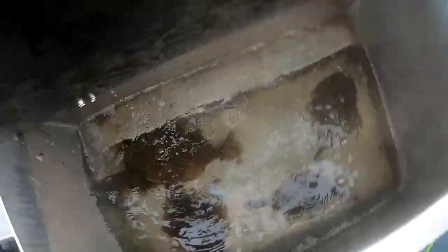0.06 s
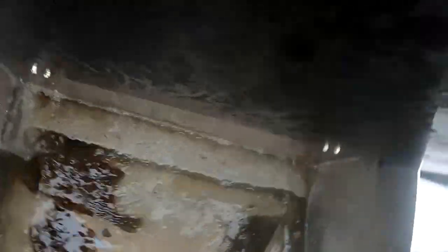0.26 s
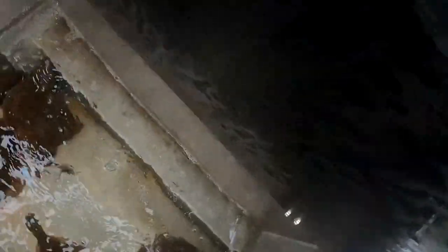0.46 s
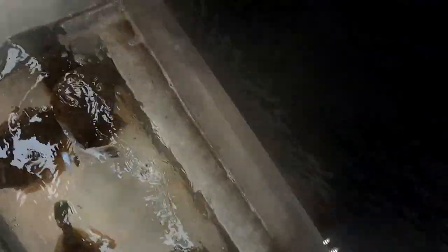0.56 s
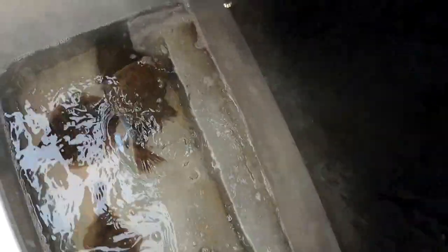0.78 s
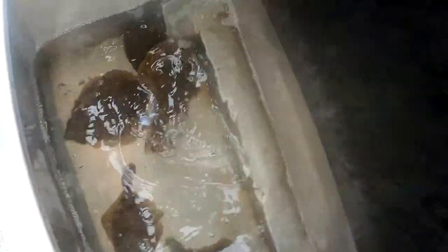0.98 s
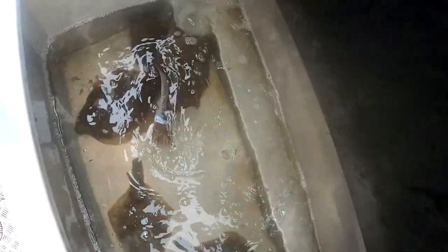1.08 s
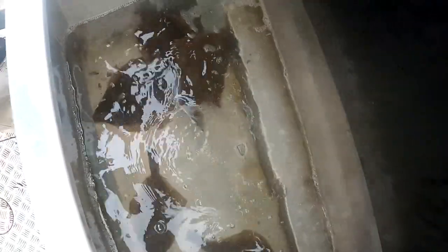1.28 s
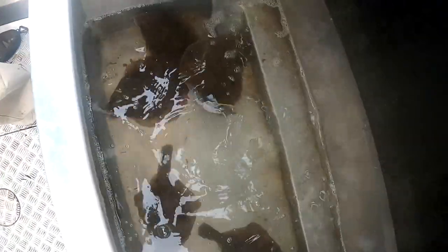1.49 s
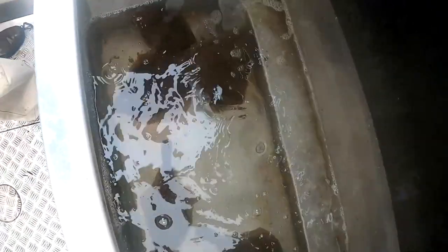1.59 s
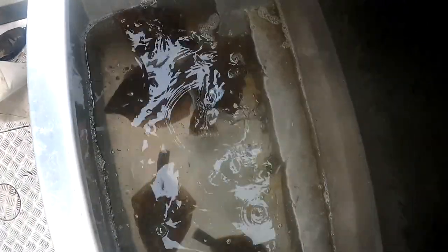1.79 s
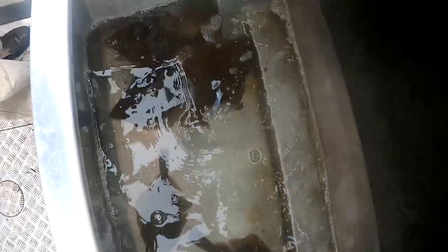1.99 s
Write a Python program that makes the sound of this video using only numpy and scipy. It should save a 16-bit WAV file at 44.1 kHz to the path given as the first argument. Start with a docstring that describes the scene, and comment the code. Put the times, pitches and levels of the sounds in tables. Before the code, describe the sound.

Water splashes close by as a fish thrashes in a boat's shallow tank, at about 0.2, 0.3 and 0.6 seconds, with slaps, spray, deep gulps and a hollow boom. The low churning fades by about 1.3 seconds while water sloshes and single drips and bubbles plink between the walls. From 1.8 seconds a small wave laps with a cluster of bubbles, over a faint outdoor hush.

```python
"""A fish thrashes three times in a boat's shallow water tank, heard from just above it.
Each splash slaps the surface, throws spray, traps big gulping pockets of air and sets the tank booming.
Then the water sloshes: single bubbles and drips plink between the walls, and a wave laps at the end.
Underneath, small bubbles fizz and a deep churn dies away into a faint outdoor hush."""
import sys
import numpy as np
from scipy import signal
from scipy.io import wavfile

SR = 44100
rng = np.random.default_rng(int(sys.argv[2]) if len(sys.argv) > 2 else 0)


def put_to_file(sound):
    """Save the sound as 16-bit audio at rate SR, in the file named by the first command-line argument."""
    columns = np.atleast_2d(sound).T  # one column per channel
    safe = np.clip(columns, -1, 1)
    whole_steps = np.round(safe * 32767)
    wavfile.write(sys.argv[1], SR, whole_steps.astype(np.int16))


N = 90404
T = np.arange(N) / SR

# strokes of the fish: start_s, boom_db, slap_db, spray_db, rise_s, t60_s
STROKES = [(0.205, 3, -19.5, -41, 0.03, 0.27), (0.3094, -1, -13, -43.5, 0.0012, 0.043),
           (0.624, -2, -12.5, -31.5, 0.01, 0.088)]
# tone of the slap and of the spray: freq_hz, density_db
SLAP_EQ = [(30, -13), (100, 4.5), (220, 0.5), (400, 1.5), (520, 2), (720, -0.5), (1150, -17), (1600, -14),
           (3000, -44)]
SPRAY_EQ = [(600, 9), (1500, 5), (2600, 19.5), (4000, -0.5), (6000, 1), (9000, -29), (12000, -40.5),
            (16000, -46)]
def splashes():
    """A dull slap and a bright burst of spray for each stroke of the fish."""
    slap, spray = shaped_noise(SLAP_EQ), shaped_noise(SPRAY_EQ)
    return sum(envelope(start, rise, t60) * (from_db(slap_db) * slap + from_db(spray_db) * spray)
               for start, _, slap_db, spray_db, rise, t60 in STROKES)


# big air pockets: start_s, pitch_hz, peak_db, rise_s, t60_s, glide_share_per_t60
AIR_POCKETS = [(0, 140.6, -40.5, 0.0027, 0.16, 0.04), (.207, 255, -12.5, 0.022, 0.22, -0.11),
               (0.207, 197, -11.5, 0.0069, 0.062, -0.12), (0.203, 100, -15.5, 0.017, 0.084, -0.03),
               (.212, 351.6, -18.5, 0.0025, 0.16, 0.25), (.310, 237, -14.5, 0.0018, 0.027, 0.37),
               (.311, 168.8, -4, 0.0058, .21, -0.67), (0.369, 151, -17, .025, 0.61, -0.04),
               (.59, 141, -22, 0.0043, 0.058, 0.2), (0.627, 290, -15.5, 0.0017, 0.086, -0.4),
               (0.637, 153.7, -11.5, 0.014, 0.21, -0.27), (0.639, 75.2, -20.5, 0.032, 0.54, -0.16),
               (.9, 128.5, -34.5, 0.098, 0.51, -.02)]
def gulps():
    """The plunging body traps big pockets of air that gulp; those dragged down sink in pitch."""
    return sum(from_db(db) * bubble(start, hz, rise, t60, glide)
               for start, hz, db, rise, t60, glide in AIR_POCKETS)


# low modes of the tank and its water: pitch_hz, level_db, t60_s
TANK_MODES = [(43.5, -33.5, 1.71), (73, -46, 2.2), (111.9, -31.5, 1.5), (131.6, -28.5, 1.59),
              (150, -25.5, 1.46), (164, -30.5, 1.34), (205, -26, 0.44), (255, -37, 0.86),
              (290, -34.5, 0.58), (354.6, -36.5, 0.5), (540, -45, 0.22)]
def tank_boom():
    """The splashes ring the tank's modes; the moving water makes them waver."""
    waver_hz, waver_db = 3.224, 1
    out = 0
    for hz, db, t60 in TANK_MODES:
        energy = sum((from_db(boom_db) * envelope(start, rise + 0.0019, t60)) ** 2
                     for start, boom_db, _, _, rise, _ in STROKES)
        tone = oscillator(hz + waver_hz * drift(rate_hz=7.6))
        gain = from_db(db + waver_db * drift(rate_hz=7.4))
        out = out + gain * np.sqrt(energy) * tone
    return out


# air modes above the waterline: pitch_hz, level_db, t60_s
HOLLOW_MODES = [(608.3, -13, 0.14), (692, -25, 0.35), (833, -23, 0.2), (997, -27, 0.23), (1140, -25, 0.17)]
def hollow(x):
    """The hollow of the tank answers a sound with boxy notes."""
    return sum(from_db(db) * ring(x, hz, t60) for hz, db, t60 in HOLLOW_MODES)


# body hits: start_s, level_db
BLOWS = [(.232, -11), (.3105, -8), (.6295, -3)]
def knocks():
    """Each flat blow of the fish on the water rings the hollow of the tank."""
    return hollow(sum(from_db(db) * signal.unit_impulse(N, int(start * SR)) for start, db in BLOWS))


# hits of flung water: start_s, level_db, t60_s
SPATTERS = [(0.3083, -24.5, 0.015), (0.356, -42, 0.017), (0.6275, -26, 0.0058), (0.721, -44, 0.027),
            (0.975, -44.5, 0.036), (1.153, -42.5, 0.062), (1.231, -41, .012), (1.57, -44.5, 0.019),
            (2.006, -37, 0.031), (2.031, -42, 0.021)]
# their tone: freq_hz, density_db
SPATTER_EQ = [(100, 2), (400, 20), (900, -3), (2400, 8), (4000, 4.5), (7000, -7.5), (10000, -14.5),
              (15000, -49.5)]
def spatters():
    """Flung water lands on the surface and the walls with short, broad cracks."""
    bursts = sum(from_db(db) * envelope(start, 0.002, t60) for start, db, t60 in SPATTERS)
    return bursts * shaped_noise(SPATTER_EQ)


# washes of water: start_s, centre_hz, level_db, rise_s, t60_s
SLOSHES = [(0.115, 802, -37, 0.0022, 0.17), (0.512, 2040, -49.5, 0.014, 0.1),
           (0.612, 587, -26.5, 0.021, 0.058), (0.69, 2820, -38.5, 0.011, 0.14),
           (0.765, 2170, -34.5, 0.0017, 0.1), (.862, 1990, -42.5, 0.0028, 0.07),
           (1.85, 3100, -55, 0.056, 0.1)]
def sloshes():
    """Falling sheets of water and lapping wavelets make soft washes without a clear note."""
    return sum(from_db(db) * envelope(start, rise, t60) * band_noise(hz, octaves=0.48)
               for start, hz, db, rise, t60 in SLOSHES)


# single bubbles and drips: start_s, pitch_hz, level_db, t60_cycles
PLINKS = [(0.04, 2600, -34.5, 26), (0.075, 6460, -45.5, 77), (0.113, 844, -32.5, 26), (0.126, 906, -26, 94),
          (0.149, 5540, -38, 60), (0.164, 1443, -39, 49), (0.218, 2825, -22, 37), (0.25, 12300, -50, 50),
          (0.273, 5820, -38, 63), (0.376, 2330, -33, 48), (0.393, 4620, -46, 73), (0.59, 7730, -38.5, 11),
          (0.762, 1807, -27.5, 20), (0.8, 1468, -39, 59), (0.94, 2316, -40, 82), (0.959, 3560, -46.5, 57),
          (1.046, 2890, -48.5, 59), (1.09, 2318, -39.5, 32), (1.157, 2990, -28.5, 126),
          (1.17, 2650, -38.5, 66), (1.217, 4900, -43.5, 23), (1.299, 1173, -43.5, 31),
          (1.316, 1290, -46.5, 82), (1.443, 9470, -44, 72), (1.448, 4270, -37, 125),
          (1.474, 6350, -43.5, 110), (1.539, 1637, -45.5, 45), (1.551, 2000, -45, 35),
          (1.613, 2090, -45.5, 41), (1.79, 989, -25, 34), (1.829, 2040, -34, 140), (1.834, 6100, -46, 170),
          (1.838, 2086, -27.5, 75), (1.855, 3740, -37, 60), (1.872, 1100, -35.5, 43),
          (1.882, 2116, -33, 120), (1.889, 9100, -38.5, 29), (1.894, 3100, -36.5, 49),
          (1.902, 5130, -39, 83), (1.907, 1200, -34.5, 160), (1.931, 8580, -29.5, 53),
          (1.933, 833, -26, 8.6), (1.937, 4500, -37, 150), (1.963, 777, -31.5, 38),
          (1.997, 682.6, -24.5, 47), (2.006, 1926, -31, 60), (2.009, 750, -22.5, 33),
          (2.011, 1580, -26.5, 42), (2.013, 2860, -32.5, 77), (2.032, 2840, -28.5, 78),
          (2.034, 3530, -31, 45), (2.035, 954, -31.5, 61)]
def plinks():
    """Each bubble pops with a short wet rasp around its pitch and rings; big, low ones climb most."""
    tone_db, rasp_db, glide_at_1khz, onset_cycles = 1.5, -8.5, 0.226, 1.85
    out = 0
    for start, hz, db, cycles in PLINKS:
        rise = 0.0014 + onset_cycles / hz
        tone = bubble(start, hz, rise, t60_s=cycles / hz, glide=glide_at_1khz * 1000 / hz)
        rasp = envelope(start, rise_s=0.0074, t60_s=0.019) * band_noise(hz, octaves=0.31)
        out = out + from_db(db + tone_db) * tone + from_db(db + rasp_db) * rasp
    return out


# a large rising bubble: start_s, pitch_hz, level_db, length_s, glide_share
BLOOPS = [(1.349, 817, -29, 0.052, 0.44)]
def bloops():
    """A fluttering note climbs ever faster until the bubble surfaces; the tank's hollow rings on."""
    attack_s, flutter_db, hollow_send_db = 0.0014, 4, -36.5
    notes = 0
    for start, hz, db, length, glide in BLOOPS:
        risen = np.clip((T - start) / length, 0, 1)
        shape = np.clip((T - start) / attack_s, 0, 1) * (1 - risen ** 2)
        notes = notes + from_db(db) * shape * oscillator(hz * (1 + glide * risen ** 3))
    notes = notes * from_db(flutter_db * drift(rate_hz=75))
    return notes + from_db(hollow_send_db) * hollow(notes)


# fader ride of the fizz: time_s, level_db
FIZZ_FADER = [(0, -52.5), (.16, -54.5), (.2, -46), (.24, -40.5), (.34, -64), (.39, -42.5), (.5, -60),
              (.53, -54), (.6, -51.5), (.65, -46.5), (.73, -54), (.9, -66.5), (1.1, -63), (1.2, -55.5),
              (1.3, -59), (1.74, -60.5), (1.86, -48), (1.92, -45.5), (1.99, -53), (2.02, -42)]
# weight of the small bubbles: pitch_hz, level_db
FIZZ_EQ = [(700, -2), (1300, 2.5), (2400, 3.5), (4000, 4.5), (6500, -0.5), (9500, -0.5), (14000, -16)]
def fizz():
    """Small bubbles of all pitches are born at random in the stirred water and ring briefly."""
    bubbles_per_s, spread_db, t60_cycles = 3800, 4.5, 64
    strengths = from_db(spread_db * np.minimum(rng.exponential(1, N), 4))
    polarity = rng.choice([-1, 1], N)
    born = rng.random(N) < bubbles_per_s / SR
    clicks = strengths * polarity * born
    pitches_hz = np.geomspace(700, 14000, 36)
    pitch_index = rng.integers(0, len(pitches_hz), N)
    rings = sum(eq_gain(FIZZ_EQ, hz) * ring(clicks * (pitch_index == k), hz, t60_cycles / hz)
                for k, hz in enumerate(pitches_hz))
    return fader(FIZZ_FADER) * rms_one(rings)


# early reflections: delay_s, level_db
REFLECTIONS = [(.0031, -15), (.0068, -17), (0.011, -21.5), (0.0174, -17)]
def walls(x):
    """The tank's walls add close reflections, a short bright tail and a longer dull one."""
    bright_db, dull_db = -4.5, -21
    bright = rng.standard_normal(N) * envelope(0.0011, rise_s=0.0042, t60_s=0.11)
    bright = rms_one(butter(bright, 1, 6000, "low"))
    dull = rng.standard_normal(N) * envelope(0.0062, rise_s=0.014, t60_s=0.28)
    dull = rms_one(butter(dull, 2, (264, 700), "band"))
    tail = (from_db(bright_db) * bright + from_db(dull_db) * dull) / np.sqrt(2 * N)
    early = sum(from_db(db) * np.interp(T - delay, T, x, left=0) for delay, db in REFLECTIONS)
    return x + early + signal.fftconvolve(x, tail)[:N]


# fader ride of the churn: time_s, level_db
CHURN_FADER = [(0, -46), (.08, -50.5), (.19, -43), (.23, -26.5), (.42, -34.5), (.57, -30), (.68, -36.5),
               (.8, -32.5), (.92, -47.5), (1.08, -45.5), (1.3, -61), (1.75, -68), (2.05, -108)]
# its tone: freq_hz, density_db
CHURN_EQ = [(25, 1), (48, 1.5), (100, 9.5), (150, 1.5), (220, -9), (400, -15.5), (800, -25), (1600, -27)]
def churn():
    """Deep churning water rumbles under the splashes, then settles."""
    return fader(CHURN_FADER) * shaped_noise(CHURN_EQ)


# tone of the ambience bed: freq_hz, density_db
HUSH_EQ = [(15, -33), (25, 1), (71, -27), (129, -16.5), (188, 0), (433, -3), (537, 28), (614, -26.5),
           (2230, -9.5), (10400, -27), (13200, -32.5), (15500, -72.5)]
def hush():
    """A faint, steady outdoor hush."""
    return from_db(-58.5) * shaped_noise(HUSH_EQ)


def from_db(db):
    """Decibels to gain."""
    return 10 ** (np.asarray(db) / 20)


def rms_one(x):
    """Scale to rms 1."""
    return x / np.sqrt(np.mean(x ** 2) + 1e-20)


def fader(points):
    """Gain over time from time_s, level_db points."""
    return from_db(np.interp(T, *np.transpose(points)))


def eq_gain(eq, hz):
    """Gain of an EQ curve at one frequency, read on a log axis."""
    freqs, db = np.transpose(eq)
    return from_db(np.interp(np.log(hz), np.log(freqs), db))


def butter(x, order, hz, kind):
    """Butterworth filter."""
    return signal.sosfilt(signal.butter(order, hz, kind, fs=SR, output="sos"), x)


def drift(rate_hz):
    """Smooth random modulation with a spread of about 1."""
    hop, warm_up = 40, 2000
    pole = np.exp(-2 * np.pi * rate_hz * hop / SR)
    white = rng.standard_normal(N // hop + warm_up + 2)
    slow = signal.lfilter([1], [1, -2 * pole, pole * pole], white)[warm_up:]
    return np.interp(np.arange(N) / hop, np.arange(len(slow)), rms_one(slow))


def shaped_noise(eq):
    """Noise coloured by a bank of half-octave bands; rms 1."""
    edges_hz = 22 * 2 ** np.arange(0, 9.6, .5)
    white = rng.standard_normal((2, N))
    out = 0
    for k, (low, high) in enumerate(zip(edges_hz, edges_hz[1:])):
        if low < eq[-1][0]:
            band = butter(white[k % 2], 3, [low, high], "band")
            out = out + eq_gain(eq, np.sqrt(low * high)) * band
    return rms_one(out)


def band_noise(hz, octaves):
    """Noise within so many octaves either side of a pitch; rms 1."""
    edges_hz = [hz * 2 ** -octaves, min(hz * 2 ** octaves, SR / 2 - 1)]
    return rms_one(butter(rng.standard_normal(N), 3, edges_hz, "band"))


def envelope(start_s, rise_s, t60_s):
    """A straight attack, then an exponential decay."""
    age = T - start_s
    return np.clip(age / rise_s, 0, 1) * from_db(-60 * np.clip((age - rise_s) / t60_s, 0, 4))


def oscillator(hz):
    """A sine that follows a pitch curve."""
    return np.sin(2 * np.pi * np.cumsum(hz) / SR)


def ring(x, hz, t60_s):
    """A resonator: a unit click sets a sine of height 1 ringing."""
    radius, angle = from_db(-60 / (t60_s * SR)), 2 * np.pi * hz / SR
    return signal.lfilter([0, np.sin(angle)], [1, -2 * radius * np.cos(angle), radius ** 2], x + 1e-18)


def bubble(start_s, hz, rise_s, t60_s, glide):
    """Trapped air rings; its pitch moves by the share `glide` per t60, upward as it nears the surface."""
    age = np.clip(T - start_s, 0, 2 * t60_s)
    phase = 2 * np.pi * hz * (age + glide * age ** 2 / (2 * t60_s))
    return envelope(start_s, rise_s, t60_s) * np.sin(phase)


def scene():
    """Surface sounds between the walls, over the booming tank and the hush; mono."""
    surface = walls(splashes() + spatters() + sloshes() + plinks() + fizz())
    deep = gulps() + tank_boom() + churn()
    return (surface + knocks() + bloops() + deep + hush())[None]


def record(dry):
    """Soft clipping rounds the peaks and a steep low-pass cuts the top."""
    ceiling, cutoff_hz = .8, 15700
    rounded = ceiling * np.tanh(dry / ceiling)
    return signal.sosfilt(signal.ellip(10, .2, 70, cutoff_hz, fs=SR, output="sos"), rounded)


dry = scene()
out = record(dry)
put_to_file(out)
```